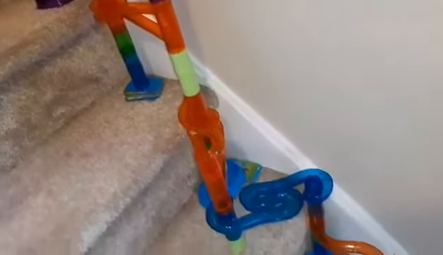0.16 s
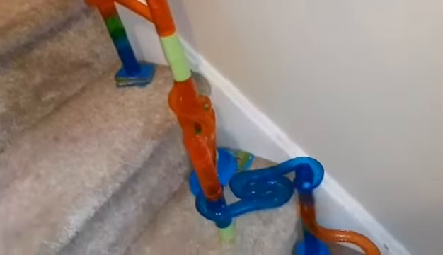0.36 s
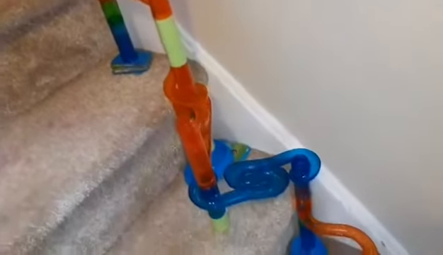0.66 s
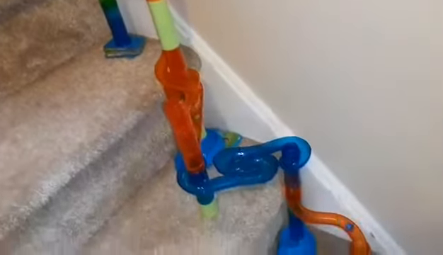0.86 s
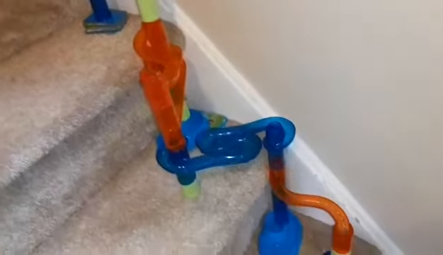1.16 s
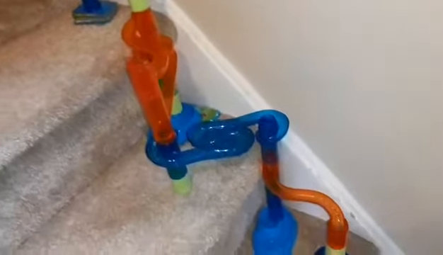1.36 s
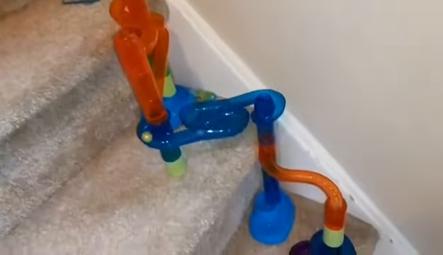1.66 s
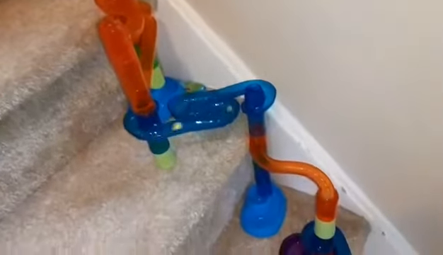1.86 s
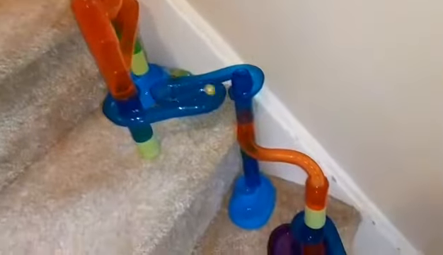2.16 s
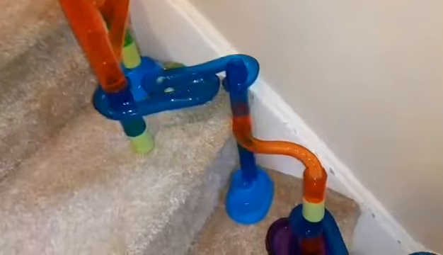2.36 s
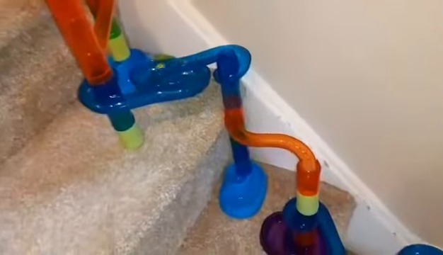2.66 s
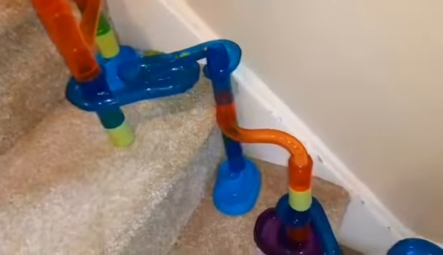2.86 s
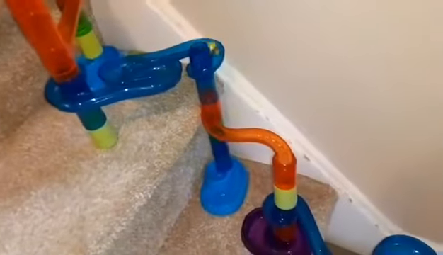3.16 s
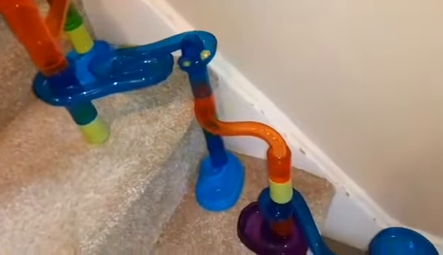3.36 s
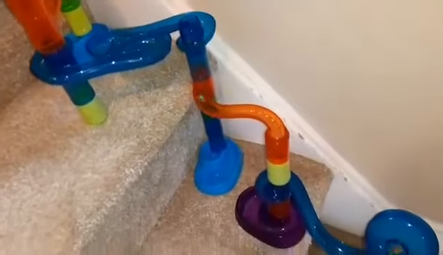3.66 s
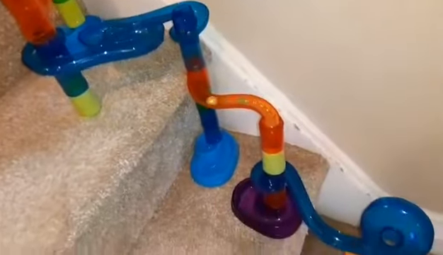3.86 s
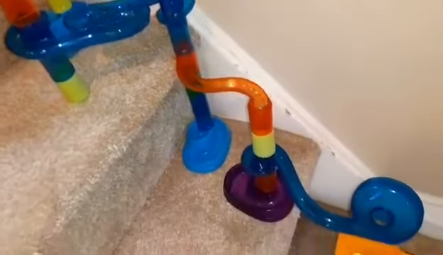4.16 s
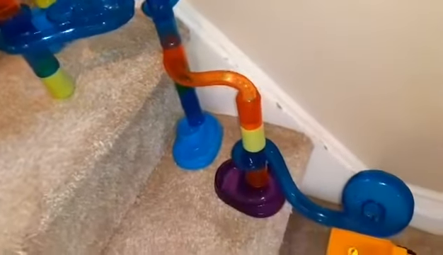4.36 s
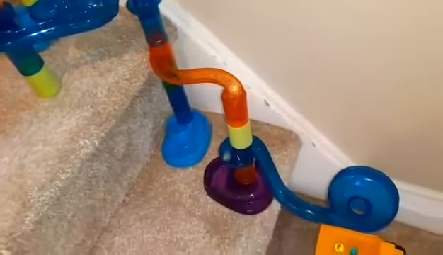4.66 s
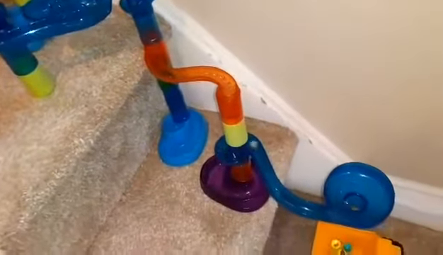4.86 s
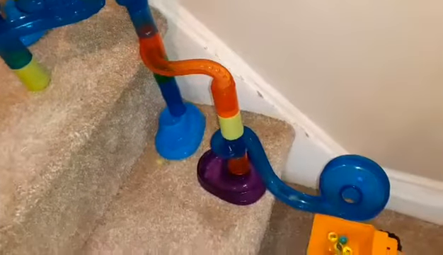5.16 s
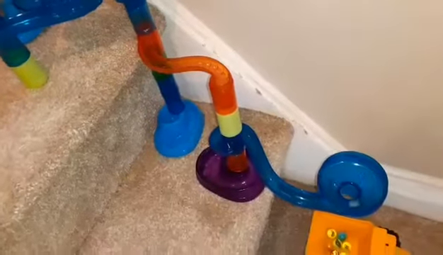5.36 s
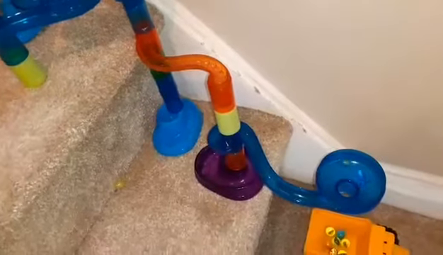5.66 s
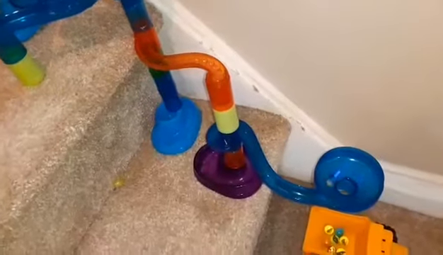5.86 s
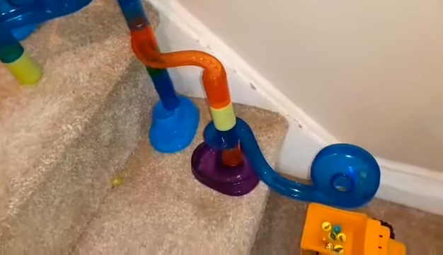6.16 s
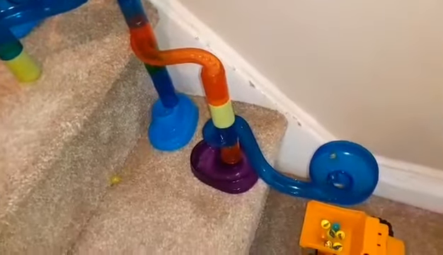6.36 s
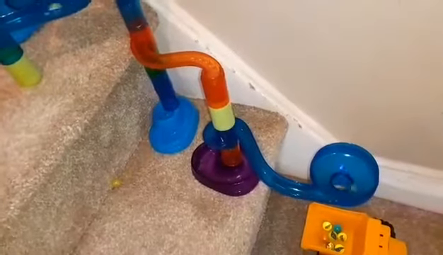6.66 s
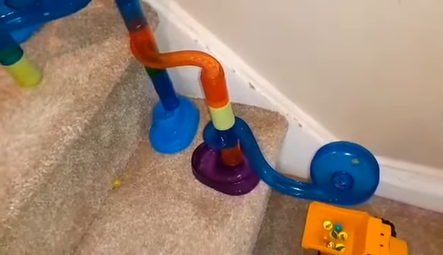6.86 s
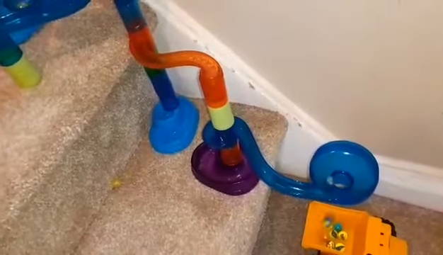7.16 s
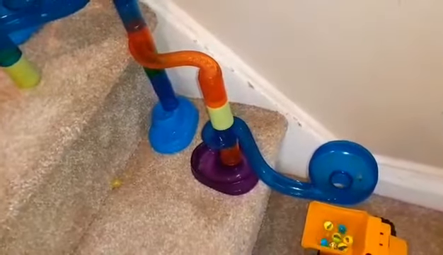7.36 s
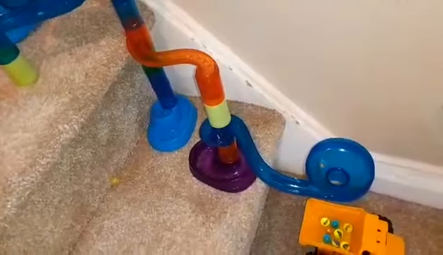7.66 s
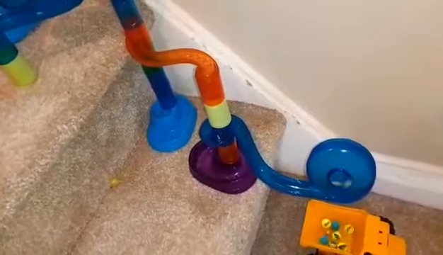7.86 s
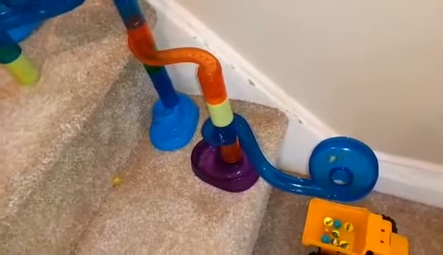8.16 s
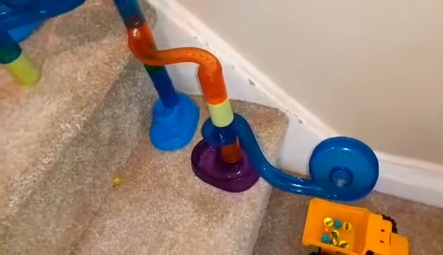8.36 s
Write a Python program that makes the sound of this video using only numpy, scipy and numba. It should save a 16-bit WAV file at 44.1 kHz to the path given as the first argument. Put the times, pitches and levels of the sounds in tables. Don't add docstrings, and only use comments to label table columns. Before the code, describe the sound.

Glass marbles clatter down hollow plastic tubes on a carpeted stair, rattle in bursts, circle a funnel and drop into a small plastic bin.

```python
import sys
import numpy as np
from scipy import signal
from scipy.fft import rfft, irfft
from scipy.io import wavfile
from scipy.ndimage import uniform_filter1d
from numba import njit

SR = 44100
rng = np.random.default_rng(int(sys.argv[2]) if len(sys.argv) > 2 else 0)


def convert_level_to_amplitude(level_db):
    exponent = np.asarray(level_db, float) / 20
    return 10 ** exponent


def unload_wav(signal):
    wavfile.write(
        sys.argv[1],
        SR,
        np.round(np.clip(np.atleast_2d(signal).T, -1, 1) * 32767).astype(np.int16),
    )


N = 374847

# time in seconds, level in dB.
ROLL_LEVEL = [(0.0, -47.5), (0.28, -49), (0.64, -35.5), (1.3, -40.5), (1.7, -41), (2.13, -46.5),
              (2.56, -51.5), (3.24, -43.5), (3.41, -35.5), (3.74, -38.5), (4.6, -49.5), (5.1, -48),
              (5.68, -46.5), (5.92, -50), (6.23, -39.5), (6.46, -48.5), (7.0, -47.5), (7.82, -57.5)]
# time in seconds, peak in dB.
SLIDES = [
    (3.912, -23.5),
    (7.272, -70),
    (8.138, -39.5),
]
# frequency in Hz, density in dB per Hz.
PATTER_COLOUR = [(410, -19), (700, 13.5), (765, 4), (925, 1.5), (1370, 7), (5000, -6.5), (9540, -30),
                 (11100, -34), (14500, -50)]
# frequency in Hz, width in Hz, level in dB.
TUBE_MODES = [(348, 51, 14), (598, 89, 15.5), (250, 83, -35.5), (735, 440, -2.5), (451, 160, 10.5)]
# frequency in Hz, density in dB per Hz.
PLASTIC_COLOUR = [(410, -32.5), (700, -5.5), (918, -10), (1480, -1.5), (1640, -4), (1820, -1), (2450, -4),
                  (2900, -2), (3660, -3), (4060, -2), (5050, -4), (6540, -3), (10000, -20), (12600, -11),
                  (15300, -52)]
# frequency in Hz, left minus right in dB.
PORT_SIDES = [(60, -5), (110, 4), (200, 21.5), (380, -2.5), (700, 5), (1280, 4), (2370, 4.5), (4370, -3.5),
              (8070, 0.5), (14900, 12)]
# start in seconds, peak in dB, bright centre in Hz, rattle in dB re peak.
CHUTE = [(0.0, -33.5, 5100, -17.5), (0.3644, -36.5, 2625, -16), (0.383, -31.5, 2840, -25),
         (0.4512, -20, 3700, -20.5), (0.5193, -22, 2800, -15.5), (0.5317, -12, 2000, -29),
         (0.5387, -20, 4170, -21), (0.614, -38, 6700, -14), (0.63, -34, 5160, -11),
         (0.6441, -10, 3300, -25.5), (0.7087, -26, 4400, -16.5), (0.7697, -15, 5300, -24.5),
         (0.8285, -30.5, 4900, -18.5), (0.8634, -13, 4380, -47), (0.8715, -13.5, 1660, -11),
         (0.9353, -15, 1370, -21), (1.0129, -15, 4700, -15), (1.0367, -10.5, 4700, -31),
         (1.072, -9, 1990, -22), (1.0942, -18.5, 4600, -8), (1.1247, -9, 3540, -21.5),
         (1.1319, -15, 4000, -25.5), (1.1926, -10, 5350, -23), (1.2469, -13, 7340, -23),
         (1.3042, -17.5, 5100, -21), (1.3455, -33.5, 2280, -5), (1.372, -25, 2160, -20.5)]
LOOP = [(1.4971, -32, 1950, -42), (1.5457, -11.5, 5800, -23), (1.6022, -21, 6050, -30),
        (1.6117, -15, 6200, -19.5), (1.6586, -15.5, 4450, -21), (1.7925, -23, 4020, -32),
        (1.8246, -22, 3560, -25), (1.8918, -37, 2830, -37), (1.9567, -33, 1910, -6),
        (1.9757, -25, 4420, -24), (2.031, -31.5, 1640, -19.5), (2.105, -26, 3000, -24.5),
        (2.179, -34, 2190, -30), (2.228, -25.5, 3030, -18), (2.3783, -31.5, 2930, -18.5),
        (2.392, -29.5, 4170, -93), (2.5387, -38, 4020, -26), (2.7077, -33, 1330, -34),
        (3.0467, -32.5, 1530, -26), (3.0893, -28.5, 4000, -19), (3.2525, -50, 2760, -15),
        (3.3544, -29, 2980, -36), (3.4008, -21.5, 3840, -46), (3.4531, -23.5, 4240, -25)]
ELBOW = [(3.478, -15, 2770, -24), (3.5151, -11, 2940, -22), (3.524, -13.5, 4500, -36),
         (3.5369, -3.5, 3070, -29), (3.55, -24, 3000, -14), (3.568, -11.5, 2980, -14),
         (3.707, -18, 3900, -13.5), (3.394, -22, 3000, -33), (3.935, -14, 1600, -20.5),
         (3.5968, -13, 4460, -20.5), (3.6787, -14, 4820, -21), (3.7289, -13.5, 4240, -25.5),
         (3.777, -11, 3100, -23), (3.8239, -8, 3000, -42), (3.8475, -8, 1800, -16.5),
         (3.8699, -12, 1480, -11.5), (4.0754, -12.5, 4260, -20.5), (4.0919, -10.5, 3350, -23),
         (4.1523, -15, 1540, -21), (4.1897, -7, 3760, -26)]
SPIRAL = [(4.3179, -15, 3940, -26), (4.3413, -18, 3280, -22), (4.3757, -14, 3830, -33),
          (4.4152, -21, 1270, -27), (4.4366, -21, 3700, -25), (4.487, -16.5, 3760, -43),
          (4.5219, -14.5, 3860, -39), (4.5459, -21.5, 4020, 1), (4.5663, -14.5, 4180, -46),
          (4.5972, -14, 2500, 13), (4.6052, -17.5, 4400, -20.5), (4.6406, -29, 2540, 6),
          (4.7684, -27, 1290, -23), (4.8182, -16, 3400, -26.5), (4.8651, -15, 3000, -26),
          (4.8866, -7.5, 3780, -25.5)]
FUNNEL = [(5.2677, -34.5, 2530, -17.5), (5.4323, -27.5, 4700, -24.5), (5.4992, -27.5, 3900, -17.5),
          (5.5985, -34.5, 2430, -23), (5.8778, -36, 2440, -5), (5.9257, -39, 2970, -13),
          (6.0894, -12, 5100, -22), (6.1467, -13, 4960, -18), (6.237, -19, 3360, -17),
          (6.4555, -37.5, 3570, -17), (6.5214, -40, 2710, -12), (6.7114, -35.5, 2970, -14),
          (6.7788, -19, 3300, -24.5), (6.8566, -32.5, 1200, -41), (6.8955, -23.5, 2400, -29),
          (6.9235, -27.5, 1330, -21)]
GLASS = [(6.9534, -34.5, 4370, -28), (7.0148, -41.5, 4350, -12), (7.0372, -36.5, 4370, -16),
         (7.0626, -18.5, 4100, -23), (7.0876, -20, 4500, -20.5), (8.1394, -22.5, 4080, -35)]
BIN = [(7.2073, -9.5, 1940, -22), (7.2238, -6, 1570, -20.5), (7.2420, -13, 1530, -13),
       (7.2865, -10, 1510, -17.5), (7.325, -15, 1520, -22), (7.345, -17.5, 1580, -22.5),
       (7.385, -22, 1490, -24), (7.463, -28.5, 1560, -18.5), (7.5433, -31, 1160, -13.5),
       (7.5967, -42, 2240, -32), (7.6326, -32.5, 1730, -25), (7.7493, -46, 1830, -37),
       (7.8945, -42.5, 1530, -12.5), (7.9124, -38, 1590, -27), (7.9878, -43, 1740, -13)]
TICKS = [(2.488, -46, 5200, -18), (7.457, -54, 6900, -41), (7.481, -38.5, 7500, -18),
         (7.51, -54, 7000, -30), (7.52, -40, 7440, -33), (7.55, -43, 7100, -31), (7.61, -40, 4460, -37),
         (7.902, -52.5, 7050, -23), (7.915, -40, 7200, -22), (7.99, -45, 8200, -29),
         (8.131, -34, 4000, -25.5)]
LAST = [(8.1394, -37, 1200, -40), (8.1973, -20.5, 2880, -21), (8.2128, -11.5, 3100, -25.5),
        (8.2951, -21.5, 3300, -39), (8.328, -11, 3400, -20.5), (8.3659, -11.5, 3300, -41),
        (8.4268, -13.5, 3180, -27.5)]
# its knocks, centre over the rest in dB, rattle t60 in seconds,
# hollow ring in dB.
PARTS = [
    (CHUTE, 8.6, .25, 2.4),
    (LOOP, 7.1, .2, -.5),
    (ELBOW, 12.9, 0.24, 0.53),
    (SPIRAL, 14.3, .24, -1.4),
    (FUNNEL, 7.8, 0.15, -6.5),
    (GLASS, 22, 0.097, -3),
    (BIN, 17.6, 0.2, -4),
    (LAST, 8.9, .26, 3.1),
    (TICKS, 1.4, 0.088, 15.4),
]
# start in seconds, end in seconds, rumble in dB.
HANDLING = [(0.282, 1.037, -51), (1.202, 1.727, -55), (1.805, 2.463, -56), (3.003, 3.65, -61),
            (4.016, 4.474, -57), (4.85, 5.39, -67.5), (6.625, 6.72, -60), (7.224, 7.334, -63),
            (8.205, 8.45, -80)]
# start in seconds, peak in dB, frequency in Hz, t60 in seconds.
THUDS = [(0.302, -32.5, 116, 0.059), (1.894, -32, 118, 0.04), (2.025, -30.5, 115, 0.064),
         (2.218, -35.5, 103.5, 0.13), (2.288, -37, 97, 0.13), (2.396, -41, 112, 0.097),
         (5.094, -31.5, 114, 0.12), (6.702, -30, 111, 0.086)]
# start in seconds, peak in dB, frequency in Hz.
HOLLOWS = [(0.385, -31, 348), (0.532, -33, 553), (0.644, -17.5, 535), (0.771, -24, 554), (0.835, -32, 345),
           (0.863, -31, 402), (1.013, -28, 353), (1.072, -34, 676), (1.497, -23.5, 355), (1.546, -39, 608),
           (1.601, -26, 662), (1.658, -31.5, 371), (1.797, -36, 340), (1.829, -36, 664), (1.906, -41, 316),
           (2.229, -43, 350), (2.253, -41, 337), (3.397, -28, 700), (3.524, -22, 635), (3.548, -13, 623),
           (3.679, -17, 620), (3.729, -25, 630), (3.777, -19, 600), (3.823, -27, 556), (3.858, -25, 360),
           (4.079, -42, 570), (4.191, -25, 336), (4.316, -32, 331), (4.344, -29, 356), (4.521, -39, 360),
           (4.87, -26.5, 326), (5.106, -40, 345), (5.435, -49, 373), (6.089, -40, 522), (6.146, -36, 331),
           (6.782, -25.5, 597), (6.896, -40, 610), (7.223, -29, 358), (7.287, -27.5, 310),
           (8.133, -35.5, 630), (8.2, -31, 595), (8.296, -45, 584), (8.33, -15.5, 617), (8.428, -28, 580)]
# start in
# seconds, peak in dB, bright centre in Hz.
CLACKS = [(0.5415, -18, 4130), (0.6288, -31, 5130), (0.7096, -24, 4340), (0.8643, -20, 4350),
          (0.8725, -10.5, 1800), (1.0139, -10, 4100), (1.0364, -12, 5950), (1.048, -16, 5480),
          (1.0938, -14.5, 4360), (1.1325, -10.5, 1940), (1.147, -19.5, 4300), (1.3038, -15.5, 5750),
          (1.311, -25.5, 5500), (3.5495, -10.5, 3660), (4.0753, -17, 4520), (4.097, -14, 3960),
          (4.205, -18, 3900), (4.644, -24, 2410), (4.66, -21, 3500), (5.4323, -30.5, 4960),
          (5.445, -36, 4950), (5.522, -35, 5040), (5.8778, -41.5, 6000), (6.0894, -10.5, 5000),
          (6.103, -14, 4260), (6.1467, -12.5, 4950), (6.223, -27, 4530), (6.293, -29.5, 4800),
          (7.0627, -15, 4670), (7.0876, -24.5, 4530), (7.2034, -15.5, 1120), (7.2074, -7, 1800),
          (7.2238, -12.5, 1800), (7.242, -16, 1500), (7.259, -18, 1300), (7.307, -19, 1700),
          (7.359, -20, 1400), (3.4717, -25, 4000), (3.527, -14.5, 2880), (3.542, -12.5, 2950),
          (3.566, -12, 2900), (3.5979, -11, 4450), (3.8483, -14.5, 5560), (3.873, -9, 1600),
          (4.8862, -6.5, 3900), (3.759, -24, 6000), (0.884, -10, 1700), (0.895, -27, 1800),
          (1.258, -17, 4300), (4.5667, -13, 3900), (5.60, -38, 4000), (5.733, -41, 5000),
          (6.189, -24, 2500), (7.285, -13, 1700),
          (1.5445, -12, 5800), (1.6028, -17, 6000), (1.6075, -22, 6000), (1.729, -30, 5000),
         (2.7077, -36, 3500), (4.3182, -15, 3950), (4.3756, -17, 4000), (4.437, -19, 4000),
         (4.4869, -18, 3950), (4.5218, -16, 4000), (4.8655, -15, 3350), (6.0894, -14, 3300),
         (6.148, -18, 13000), (6.238, -18, 13200), (6.2375, -26, 1150), (6.25, -27, 1300),
         (6.19, -29, 1050), (4.319, -22, 12800), (4.376, -22, 12800), (4.344, -26, 13000),
         (8.33, -22, 12500), (8.43, -22, 12800), (8.132, -30, 3000), (8.2175, -16, 3000),
         (8.369, -15, 3300), (5.879, -34, 11500), (5.4335, -27, 5100), (7.064, -16, 4600),
         (7.2075, -18, 7000), (7.2245, -18, 6500)]
# start in seconds, peak in dB, frequency in Hz,
# t60 in seconds.
TAP_MODES = [
    (1.4996, -7, 860, 0.0072),
    (1.4996, -25, 1800, 0.004),
    (1.4996, -20, 2900, 0.0034),
    (1.4996, -9, 2200, 0.003),
]


def level(x, db):
    return x * convert_level_to_amplitude(db) / np.sqrt(np.mean(x ** 2))


def columns(table):
    return [column[:, None] for column in np.transpose(table)]


def band(x, hz, width):
    return signal.lfilter(*signal.iirpeak(hz, hz / width, SR), x)


def high_pass(x, hz):
    return signal.sosfilt(signal.butter(2, hz, "high", fs=SR, output="sos"), x)


def shape(x, points):
    size = 2048
    hz, db = np.transpose(points)
    grid = np.log(np.maximum(np.fft.rfftfreq(size, 1 / SR), 1))
    gain_db = np.interp(grid, np.log(hz), np.maximum(db, -60))
    cep = irfft(np.log(convert_level_to_amplitude(gain_db)))
    cep[1:size // 2] *= 2
    cep[size // 2 + 1:] = 0
    response = irfft(np.exp(rfft(cep)))
    return signal.fftconvolve(x, response[None], axes=1)[:, :N]


@njit
def rings(start, hz, t60, size, length):
    out = np.zeros(length)
    for k in range(len(hz)):
        turn = np.exp(2j * np.pi * hz[k] / SR - np.log(1000) / (t60[k] * SR))
        z = size[k] + 0j
        for i in range(max(int(start[k] * SR), 0), min(int((start[k] + t60[k]) * SR), length)):
            out[i] += z.imag
            z *= turn
    return out


def ports(start, hz, t60, db, aim, aim_db):
    side_hz, side_db = np.transpose(PORT_SIDES)
    shade_db = np.interp(np.log(hz), np.log(side_hz), side_db)
    half_db = (aim_db * aim + shade_db) / 2
    lag = .00028 * (1 + .7 * np.sin(40 * aim))
    spread = np.broadcast_arrays(1. * start, 1. * hz, 1. * t60, db, half_db, lag)
    start, hz, t60, db, half_db, lag = map(np.ravel, spread)
    left = rings(start, hz, t60, convert_level_to_amplitude(db + half_db), N)
    right = rings(start + lag, hz, t60, convert_level_to_amplitude(db - half_db), N)
    return np.array([left, right])


def plastic(chance, start, db, centre_hz, focus_db, ring_s, fade_db=0):
    hz = 800 * 19 ** chance[..., 0]
    octaves = np.log2(hz / centre_hz)
    db = db + 4.5 * np.log2(hz / 3000)
    db = db + focus_db * (np.exp(-(octaves / .3) ** 2) - 1)
    db = db - fade_db * (hz / 3000) ** 0.14
    t60 = ring_s * (hz / 3000) ** -.45
    aim = 2 * chance[..., 1] - 1
    return ports(start, hz, t60, db, aim, aim_db=np.minimum(hz / 350, 11))


def motion():
    bump_db, bump_s = 4.5, 0.023
    rise_db_s, fall_db_s, slide_hum_db = 189, 213, -11.5
    t = np.arange(N) / SR
    step = int(bump_s * SR)
    bumps = uniform_filter1d(np.repeat(rng.standard_normal(N // step + 1), step)[:N], step)
    roll_db = np.interp(t, *np.transpose(ROLL_LEVEL)) + bump_db * bumps
    slide = 0
    for peak_s, db in SLIDES:
        slope_db = np.maximum(rise_db_s * (peak_s - t), fall_db_s * (t - peak_s))
        slide = slide + convert_level_to_amplitude(db - slope_db)
    hum_db = -50 + 0.7 * (roll_db + 41.5)
    return convert_level_to_amplitude(roll_db) + slide, convert_level_to_amplitude(hum_db) + convert_level_to_amplitude(slide_hum_db) * slide


def rolling(count=40000):
    patter_gain, hum_gain = motion()
    chance = rng.random((count, 4))
    start = chance[:, 2] * N / SR
    tick_db = -2.0 * np.log(1 - chance[:, 3])
    ticks = plastic(chance, start, tick_db, 1780, focus_db=-3.0, ring_s=0.035)
    noise = rng.standard_normal((2, N))
    air = noise[0] + .5 * noise[1] * np.array([[1], [-1]])
    hum = sum(convert_level_to_amplitude(db) * band(air, hz, width) for hz, width, db in TUBE_MODES)
    return level(shape(ticks, PATTER_COLOUR), 0) * patter_gain + level(hum, 0) * hum_gain


def knock_rows():
    rows = [(*knock, *answer) for part, *answer in PARTS for knock in part]
    start, db, hz, rattle_db, focus_db, t60, hollow_db = columns(rows)
    focus_db = focus_db + 0.46 * (-6 - db)
    return start, db, hz, focus_db, rattle_db, np.maximum(t60, .05), hollow_db


def knocks(count=80, rattle_count=380, contact_count=9):
    contact_share, contact_s = 0.064, 0.0028
    start, db, hz, focus_db, rattle_db, t60, hollow_db = knock_rows()
    focus = np.maximum(focus_db, 0)
    chance = rng.random((len(start), count + rattle_count, 5))
    first, later = chance[:, :count], chance[:, count:]
    blow_start = start + .0026 * first[..., 2] ** 2.2
    blow = plastic(first, blow_start, db - 6 + .25 * focus_db, hz, .95 * focus, ring_s=.016)

    which = (later[..., 2] * contact_count).astype(int)
    rebounds = np.take_along_axis(rng.random((len(start), contact_count)), which, axis=1)
    bunched = later[..., 4] < contact_share
    after = 0.55 * t60 * np.where(bunched, rebounds, later[..., 2])
    after = after + bunched * contact_s * later[..., 4] / contact_share
    scatter_db = -1.2 * np.log(1 - later[..., 3])
    later_db = db + 15.5 + np.minimum(rattle_db, -14) + scatter_db
    rattle = plastic(later, start + .005 + after, later_db, hz, 0.66 * focus, ring_s=0.024,
                     fade_db=60 * after / t60)

    tube_hz, width, tube_db = np.transpose(TUBE_MODES)
    shake = rng.standard_normal((len(start), len(TUBE_MODES), 4))
    body_start = start + 0.00415 * np.abs(shake[..., 0])
    body_hz = tube_hz * (1 + 0.045 * shake[..., 1])
    body_db = db + hollow_db + tube_db + 2.5 * shake[..., 3] - 35.0 - 3.3 * np.log2(hz / 3000)
    body = ports(body_start, body_hz, 3.03 / width, body_db, shake[..., 2], aim_db=0.5)
    return shape(blow + rattle, PLASTIC_COLOUR) + high_pass(body, 170)


@njit
def walls(x, lags, gain, damp):
    line, soft, out = np.zeros((8, 4096)), np.zeros(8), np.zeros((2, len(x)))
    for i in range(len(x)):
        total = 0.
        for k in range(8):
            soft[k] += (1 - damp) * (gain[k] * line[k, (i - lags[k]) & 4095] - soft[k])
            total += soft[k]
            out[k % 2, i] += soft[k]
        for k in range(8):
            line[k, i & 4095] = x[i] + soft[k] - total / 4
    return out


def stairwell(hits):
    t60, damp, room_db, alike_hz = 0.14, 0.8, -0.5, 1700
    lags = rng.integers(300, 1500, 8)
    gain = np.minimum(convert_level_to_amplitude(-60 * lags / SR / t60), .98)
    room = walls(hits.mean(axis=0) + 1e-18, lags, gain, damp)
    apart = signal.lfilter(*signal.butter(1, alike_hz, "high", fs=SR), room[0] - room[1]) / 2
    return convert_level_to_amplitude(room_db) * (room.mean(axis=0) + apart * np.array([[1], [-1]]))


def handling():
    still_db, fade_db_s = -80, 124
    t = np.arange(N) / SR
    gain = convert_level_to_amplitude(still_db)
    for start, end, db in HANDLING:
        outside = np.maximum(np.maximum(start - t, t - end), 0)
        gain = gain + convert_level_to_amplitude(db - fade_db_s * outside)
    coarse = np.repeat(rng.standard_normal(N // 20 + 1), 20)[:N]
    flicker = convert_level_to_amplitude(55 * uniform_filter1d(coarse, 2000))
    low = band(band(rng.standard_normal((2, N)), 73, 94), 109.5, 100)
    return level(flicker * low * convert_level_to_amplitude([[-3], [3]]), 0) * gain


def thuds(count=6):
    start, db, hz, t60 = columns(THUDS)
    chance = rng.random((len(start), count))
    spread = 2 ** np.linspace(-.3, 1.6, count)
    soft_db = db - 13.0 - 0.87 * np.log2(spread)
    return ports(start + 0.0255 * chance, hz * spread, t60, soft_db, -1.77, aim_db=13.0)


def air_columns():
    start, db, hz = columns(HOLLOWS)
    return high_pass(ports(start, hz, 31 / hz, db - 3.5, 0., aim_db=0), 200)


def clacks(count=40):
    start, db, hz = columns(CLACKS)
    chance = rng.random((len(start), count, 3))
    mode_start = start + 0.00087 * chance[..., 2]
    sharp = plastic(chance, mode_start, db + 0.5, hz, focus_db=17, ring_s=0.02)
    return shape(sharp, PLASTIC_COLOUR)


def finger_tap():
    start, db, hz, t60 = np.transpose(TAP_MODES)
    return ports(start, hz, t60, db, 1., aim_db=7)


def scene():
    left_db = -1.46
    steady = rolling() + handling() + thuds() + finger_tap()
    hits = knocks() + air_columns() + clacks()
    return (hits + stairwell(hits) + steady) * convert_level_to_amplitude([[left_db], [-left_db]])


def low_pass(x):
    return signal.sosfilt(signal.butter(12, 15490, fs=SR, output="sos"), x)


def record(dry):
    thin = high_pass(dry, 55)
    rounded = np.tanh(1.05 * thin) / 1.05
    top_cut = signal.cheby1(4, .5, 13300, fs=SR, output="sos")
    return low_pass(signal.sosfilt(top_cut, rounded))


dry = scene()
out = record(dry)
unload_wav(out)
```